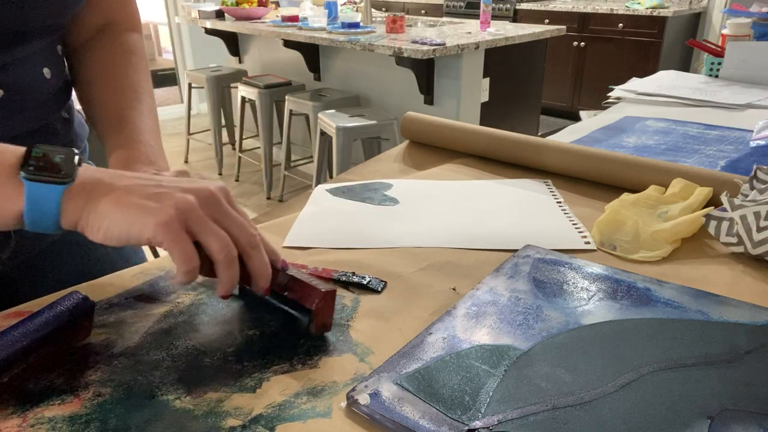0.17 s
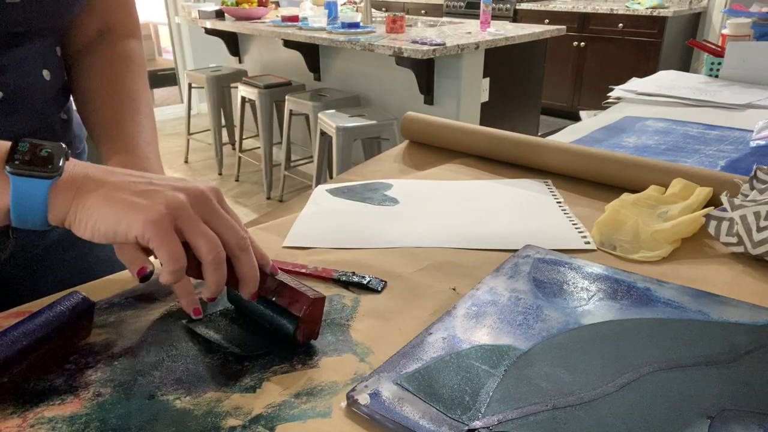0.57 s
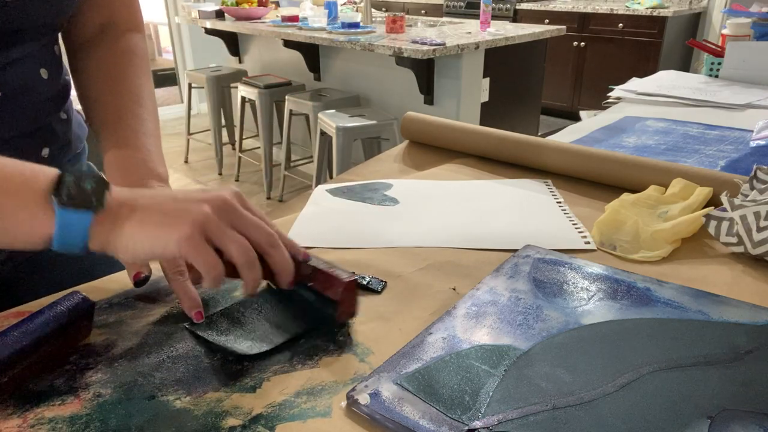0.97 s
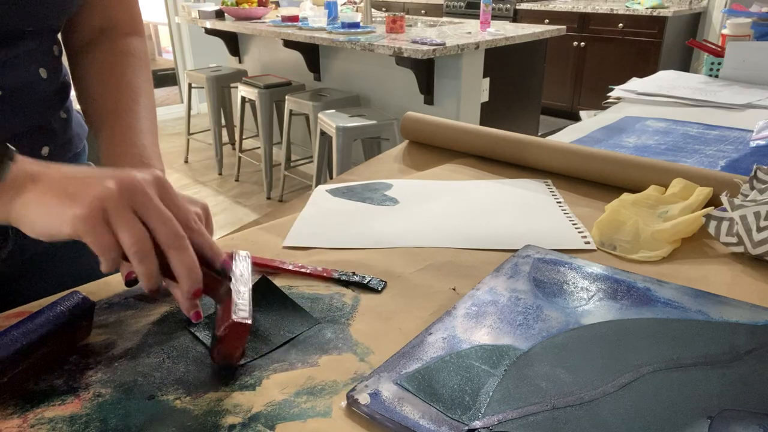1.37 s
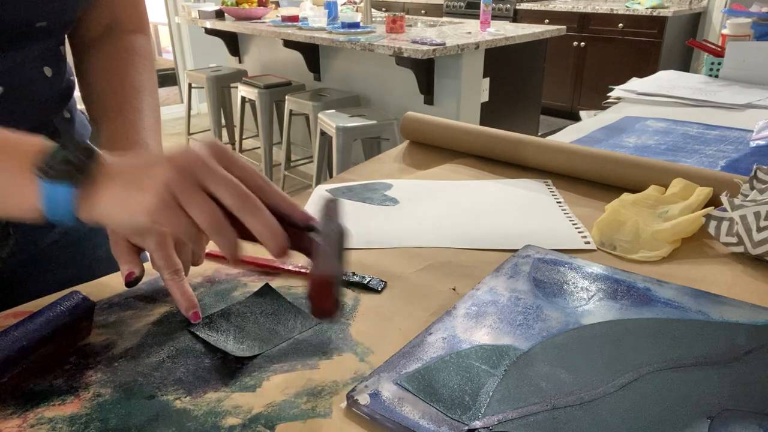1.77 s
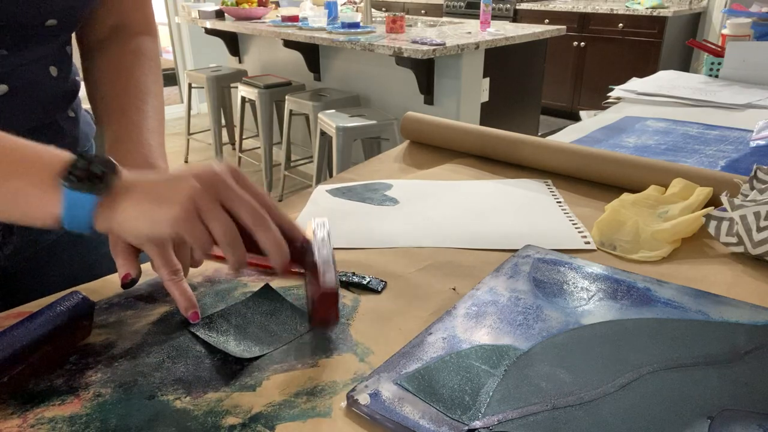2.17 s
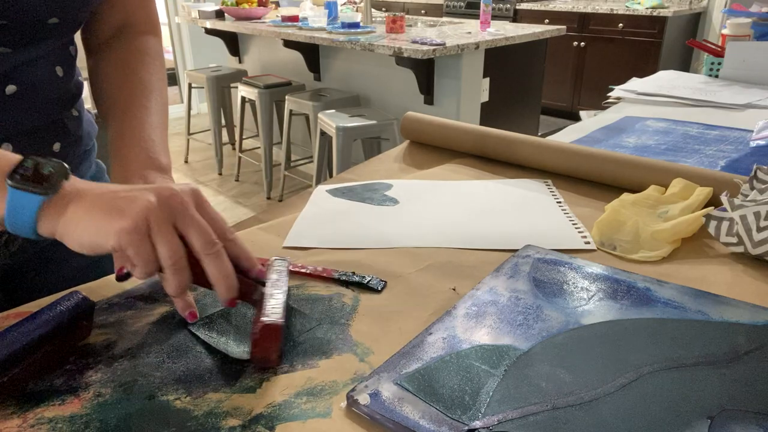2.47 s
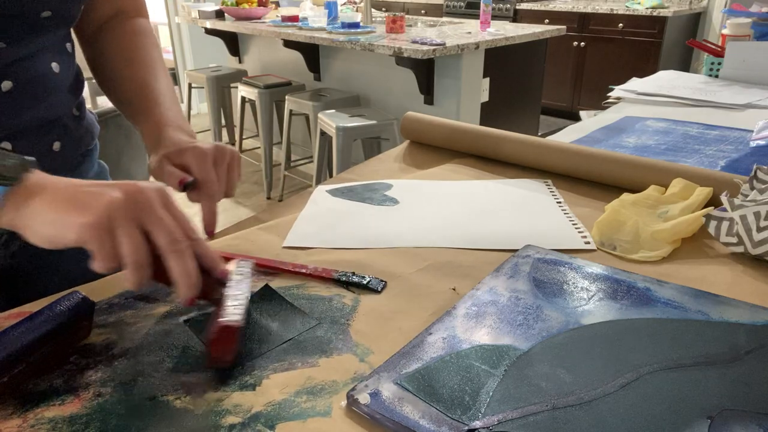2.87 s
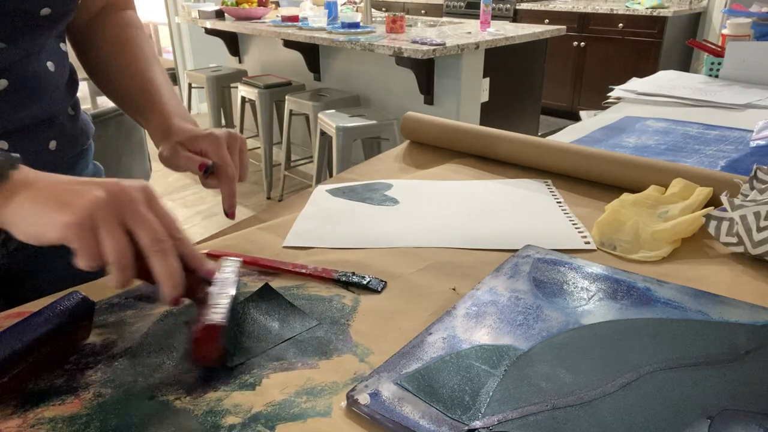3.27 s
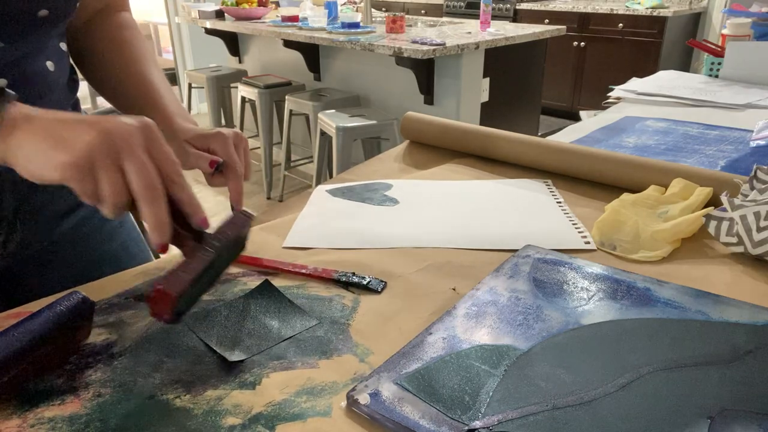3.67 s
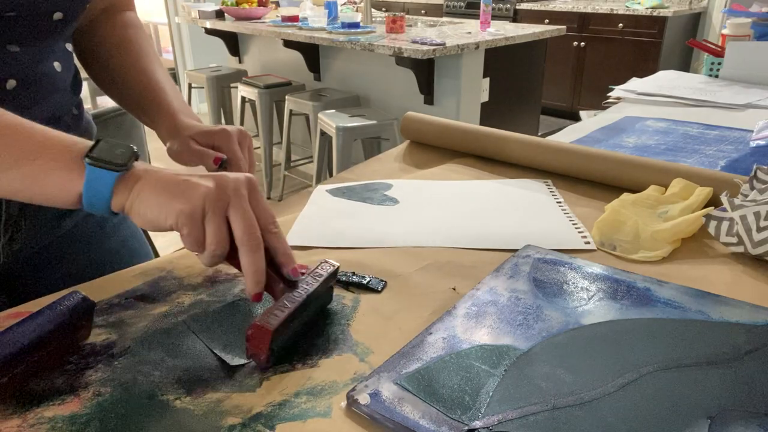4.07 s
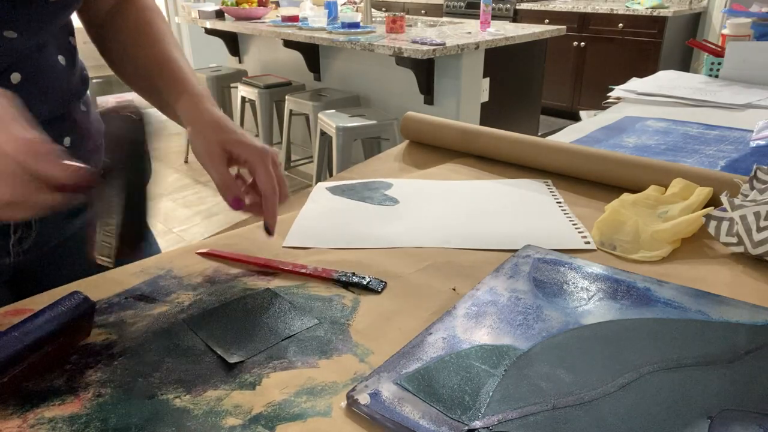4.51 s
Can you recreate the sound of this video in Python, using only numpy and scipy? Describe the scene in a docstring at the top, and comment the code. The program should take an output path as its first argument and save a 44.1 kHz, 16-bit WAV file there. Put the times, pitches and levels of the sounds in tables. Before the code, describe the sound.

Sticky hissing strokes of an ink roller on paper, with loose frame clicks and hard table knocks in a softly humming kitchen.

```python
"""A rubber hand roller goes back and forth over inked paper on a kitchen table, close to a phone.
Ink threads snap behind it: grainy noise through resonances makes a dense crackling hiss.
The loose axle clicks in its frame and the table thuds, both as short rings of blurred modes;
rolling also rumbles the table. Paper rustles and a light rub passes as shaped noise.
Walls add a noise echo, over room tone in flickering bands and a wavering refrigerator hum."""
import sys
import numpy as np
from scipy import signal
from scipy.fft import rfft, irfft, next_fast_len
from scipy.io import wavfile
from scipy.ndimage import uniform_filter1d

SR = 44100
rng = np.random.default_rng(int(sys.argv[2]) if len(sys.argv) > 2 else 0)


def generate_wav(sig):
    """Save sig (samples, or channels by samples) to the path in sys.argv[1] as 16-bit PCM at SR."""
    pcm = np.round(np.clip(np.atleast_2d(sig).T, -1, 1) * 32767).astype(np.int16)
    wavfile.write(sys.argv[1], SR, pcm)


N = 204705

# Room tone spectrum, relative: pitch_hz, density_db (per Hz)
ROOM_TONE = [(30, -40), (55, 4), (90, -18.5), (124, 18.5), (145, -17), (239, -16), (266, -7), (345, -28.5),
             (499, -47.5), (600, -14), (962, -91.5), (16000, -83)]
ROOM_TONE_DB = -50  # rms level of the whole room tone
HUM_HZ, HUM_DB = 116.5, -49.5  # centre pitch and level of the wavering hum

# Paper and fingers rustling, joined by straight lines: time_s, level_db (gain on the rustle noise)
RUSTLE_LEVELS = [(0.0, -59.5), (0.2, -65), (0.36, -78), (0.61, -87.5), (0.95, -64.5), (1.12, -63),
                 (1.31, -65), (1.36, -77.5), (1.44, -63.5), (1.76, -56), (1.96, -63), (2.1, -51.5),
                 (2.38, -62.5), (2.5, -57.5), (2.8, -66.5), (3.5, -57), (3.8, -76), (4.06, -60),
                 (4.64, -60)]

# Axle clicks: start_s, peak_db (of the mid), tilt_db (brightness, per octave),
# ring_length (ratio to a free ring)
AXLE_CLICKS = [(0.0455, -38, -15.5, .8), (0.069, -21, -10.5, 0.4), (0.0777, -35, -11, .6),
               (0.171, -37.5, 17, 1), (0.642, -56, 7.5, 1.5), (1.084, -41, -3, 1.5), (1.1, -34, -11, 0.91),
               (1.109, -43, -13, 1.7), (1.117, -46, -12, 1.3), (1.4541, -15.5, 2, 1),
               (1.7488, -35, 2, 1.66), (1.831, -33.5, -18, 0.92), (1.981, -39, -7, 0.92),
               (1.99, -25.5, 2, 1.4), (1.9934, -14.5, -1, 0.81), (1.9976, -5.5, -2, 0.53),
               (2.2108, -36, -15, 0.87), (2.2974, -34, -12, 1.4), (2.3417, -42, -6, 1.1),
               (2.423, -20, 1, 0.36), (2.425, -24, 1.5, 1.3), (2.595, -36.5, -30, 1.9),
               (2.884, -23.5, 2.5, 1.07), (3.196, -31.5, -11.5, 1.6), (3.4254, -34.5, -11, 0.95),
               (3.483, -33.5, -5, 0.55), (3.492, -38, -12, 1), (3.499, -36, -12, 1.58),
               (3.8494, -20.5, 1, 0.89), (3.8533, -5.5, -2.5, .85), (3.8625, -27, -2, 1.1),
               (3.867, -25, -2, 1.2), (4.411, -31.5, -28, 1.54)]
# Roller frame modes: pitch_hz, width_hz, level_db (before each click's tilt), t60_s (of a free ring)
FRAME_MODES = [(1656, 550, -6, 0.007), (2169, 160, -13, 0.018), (2482, 190, -0.5, 0.011),
               (3003, 74, -21.5, 0.077), (3088, 1130, 9.5, 0.0081), (3980, 690, -6, 0.0094),
               (7040, 3600, -7.5, 0.0072)]

# Roller or fingers on the table: start_s, peak_db (body), bass_peak_db, tilt_db (hardness, per octave),
# middle_db (modes near MIDDLE_HZ, which depend on where the blow lands)
TABLE_THUDS = [(0.068, -37.5, -41, 5, -3.5), (0.196, -42.5, -46, 2, -9), (0.615, -47, -53, -1, -5),
               (0.773, -41.5, -65, -12.5, 4), (1.082, -36.5, -56, 6.5, -7), (1.097, -33, -31.5, 13.5, -3),
               (1.4522, -21, -21.5, 0, 3), (1.747, -37, -34, 6, -7.5), (1.994, -14, -21, 0.5, -10.5),
               (2.422, -11, -18, -3, -10.5), (2.887, -41.5, -46, 9.5, 5), (3.009, -51, -37, 7, 0),
               (3.196, -40.5, -48, 6, -3), (3.41, -38, -39.5, 3.5, 0.5), (3.484, -31, -36.5, 9, 0),
               (3.8516, -9.5, -19, 1, -3.5), (4.408, -30.5, -35, 4, -7)]
# Table top modes, damped and dense: pitch_hz, width_hz, level_db (before tilts), t60_s
# The first three rows are the bass.
TABLE_MODES = [(60, 17, -22.5, 0.04), (99.5, 40.5, -0.5, 0.14), (143, 79, -8, 0.12), (202, 57, 4, 0.056),
               (272.3, 43, 5, 0.068), (380.8, 45, 1, 0.066), (487, 31, -4, 0.15), (589.5, 64, 1, 0.027),
               (699.5, 78, -4, 0.059), (916, 134, -9.5, 0.05), (1243, 230, -10, 0.043),
               (1654, 880, -18.5, 0.073), (558, 520, 6.5, .016)]
MIDDLE_HZ, MIDDLE_OCTAVES = 460, 0.18
RUMBLE_TILT_DB = -0.5  # per octave, across the modes that rolling shakes

# Roller strokes: fastest_s, rise_s (speeding up), fall_s (slowing down), start_softness (power),
# hiss_db (ink), dull_db (duller part of the hiss, relative), rumble_db (table)
ROLLER_STROKES = [(.175, 0.03, 0.18, .9, -66, -3.5, -75), (0.914, .12, 0.25, 1.04, -43.5, -12, -74),
                  (1.594, 0.13, 0.16, 0.54, -40.5, -11.5, -51.5), (2.099, 0.12, 0.11, 1.7, -37, -11, -41.5),
                  (2.434, 0.022, 0.025, 0.37, -56, 0, -48), (2.672, 0.16, 0.21, 0.74, -38, -13, -57),
                  (2.909, 0.08, 0.098, 1.8, -38.5, -11.5, -52.5), (3.059, 0.051, 0.11, 0.54, -38, -10, -56),
                  (3.225, 0.049, 0.096, 0.45, -43, -10.5, -68), (3.35, 0.033, 0.15, 0.5, -39.5, -10, -56),
                  (3.981, 0.15, 0.24, 1.06, -44, -6, -46.5), (4.279, 0.13, 0.14, 0.56, -34, -13.5, -53)]
FALL_POWER = 3.8  # hiss gain follows the falling roller speed to this power; the rumble follows less

# Brighter ink hiss resonances: pitch_hz, width_hz, level_db
BRIGHT_INK = [(10800, 2920, 8.5), (12670, 3040, 10), (14080, 1880, 7.5), (8600, 1800, 6.5)]
# Duller ink hiss resonances: pitch_hz, width_hz, level_db (before flicker and dull_db)
DULL_INK = [(6690, 440, 17.5), (5500, 300, 13.5), (4310, 130, 15.5), (2977, 1370, 13.5), (2412, 240, 6)]
# Larger snaps where paper or roller meets or leaves the ink: start_s, peak_db (drive into the hiss)
INK_PEELS = [(0.142, -50.5), (0.171, -54), (0.8087, -41.5), (0.8226, -40), (0.837, -40), (0.856, -32.5),
             (0.8826, -41), (0.951, -36.5), (0.965, -36), (0.988, -37), (1.092, -43.5), (1.998, -37),
             (4.384, -45)]
LINGER_DB, LINGER_T60_S = -10, 0.38  # the wet ink keeps crackling faintly after a stroke
SNAP_SPREAD_DB, PATCHY_DB = 1.57, 0.74  # spread of snap sizes; flicker of each duller band

# A faint narrow rub leads into the first long stroke.
SCUFF_START_S, SCUFF_END_S = 0.612, 0.77
SCUFF_HZ, SCUFF_WIDTH_HZ, SCUFF_DB = 1840, 390, -75

ROOM_T60_S, ROOM_TREBLE_T60_S, ROOM_DB = 0.56, 0.18, -9.5
PORT_LAG_S, SHARED_HZ = .000169, 6600  # delay of the right treble; crossover to shared treble
TOP_HZ = 16100


def undb(db):
    """Decibels to gain."""
    return 10 ** (np.asarray(db) / 20)


def unit(x):
    """Scale to rms 1."""
    return x / np.sqrt(np.mean(x ** 2))


def band(x, hz, width_hz):
    """Resonance run twice for steep sides, gain 1 at the centre."""
    b, a = signal.iirpeak(hz, hz / width_hz, SR)
    once = signal.lfilter(b, a, x)
    return signal.lfilter(b, a, once)


def walk(rate):
    """Random levels held for 1 / rate seconds and smoothed twice; spread near 1."""
    hold = int(SR / rate)
    steps = np.repeat(rng.standard_normal(N // hold + 1), hold)
    smooth = uniform_filter1d(uniform_filter1d(steps, hold), hold)
    return 1.3 * smooth[:N]


def stereo(mid, side, share):
    """Mid in both channels, with a share of the side added left and subtracted right."""
    return mid + share * side * np.array([[1], [-1]])


def add(track, start_s, x):
    """Mix a short sound in at its start time."""
    i = int(start_s * SR)
    x = x[..., :N - i]
    track[..., i:i + x.shape[-1]] += x


def kitchen():
    """Room tone in flickering half-octave bands, more alike left and right in the bass, plus the hum."""
    tone = 0
    table_hz, table_db = np.transpose(ROOM_TONE)
    for hz in 35 * 2 ** np.arange(0, 8.9, .5):
        mid = unit(band(rng.standard_normal(N), hz, hz / 2))
        side = unit(band(rng.standard_normal(N), hz, hz / 2))
        density_db = np.interp(np.log(hz), np.log(table_hz), table_db)
        band_db = density_db + 10 * np.log10(hz) + 2.6 * walk(12.0)
        tone = tone + undb(band_db) * stereo(mid, side, np.clip(hz / 640.0, .25, .85))
    hum_hz = HUM_HZ * (1 + 0.0031 * walk(1.92))
    hum = np.sin(2 * np.pi * np.cumsum(hum_hz) / SR) * undb(HUM_DB + 1.8 * walk(5.8))
    return unit(tone) * undb(ROOM_TONE_DB) + hum


def rustle():
    """Paper friction as soft broad noise, falling towards the treble and slightly grainy."""
    grain = undb(2 * walk(50)) * rng.standard_normal((2, N))
    soft = unit(band(grain, 1200, 4000))
    crisp = undb(-16.5) * unit(band(grain, 3590, 2000))
    airy = undb(-9.0) * unit(band(grain, 6100, 4600))
    mid, side = soft + crisp + airy
    time_s, level_db = np.transpose(RUSTLE_LEVELS)
    level = undb(np.interp(np.arange(N) / SR, time_s, level_db))
    return level * stereo(mid, side, 1.0)


def ring(modes, gains, length_s, rise_cycles, blur):
    """One blow on a damped body: each mode is a sine blurred by its crowd of close neighbours; mid peak 1."""
    t = np.arange(int(length_s * SR)) / SR
    out = 0
    for k, ((hz, width_hz, level_db, t60_s), gain) in enumerate(zip(modes, gains)):
        noise = rng.standard_normal((2, 2 * len(t)))
        crowd = blur * unit(band(noise, hz, width_hz)[:, len(t):])  # skips the filter's build-up
        detuned_hz = hz + 0.19 * width_hz * rng.standard_normal()
        crowd[0] += np.sin(2 * np.pi * detuned_hz * t)  # starts in step with the blow
        swell = (1 - np.exp(-t * hz / rise_cycles)) ** 2 * 1000. ** (-t / t60_s)
        # every blow feeds a mode its full energy
        energy = np.sum((crowd * swell) ** 2, axis=1, keepdims=True)
        share = np.sqrt(np.sum(swell ** 2) / energy)
        direction = (-1) ** k  # successive table rows start in opposite directions
        out = out + direction * gain * undb(level_db) * share * crowd * swell
    return out / np.abs(out[0]).max()


def axle():
    """The axle knocks its bearing: short frame rings; a gripping hand cuts them and mutes the narrow modes."""
    out = np.zeros((2, N))
    for start_s, peak_db, tilt_db, ring_length in AXLE_CLICKS:
        gains, held = [], []
        for hz, width_hz, level_db, t60_s in FRAME_MODES:
            grip = ring_length ** 2 if width_hz < 250 else 1  # a longer ring strengthens them instead
            gains.append(undb(tilt_db * np.log2(hz / 3000)) * grip)
            held.append((hz, width_hz, level_db, t60_s * ring_length))
        mid, side = ring(held, gains, 0.063, rise_cycles=4.36, blur=0.79)
        add(out, start_s, undb(peak_db) * stereo(mid, side, 0.46))
    return out


def strokes(peaks_db, sharpness=1):
    """Gain driven by the roller: each stroke follows a sine arch of speed; low sharpness follows it less."""
    out = np.zeros(N)
    for (fastest_s, rise_s, fall_s, softness, *_), peak_db in zip(ROLLER_STROKES, peaks_db):
        rise = np.sin(np.linspace(0, np.pi / 2, int(rise_s * SR)))
        fall = np.sin(np.linspace(0, np.pi / 2, int(fall_s * SR)))[::-1]
        arch = np.concatenate([rise ** softness, fall ** FALL_POWER])
        add(out, fastest_s - rise_s, undb(peak_db) * arch ** sharpness)
    return out


def table():
    """Soft rubber blows and rolling both shake the table top; its bass is nearly alike left and right."""
    out = np.zeros((2, N))
    bass, body = TABLE_MODES[:3], TABLE_MODES[3:]
    for start_s, peak_db, bass_peak_db, tilt_db, middle_db in TABLE_THUDS:
        gains = []
        for hz, *_ in body:
            middle = np.exp(-(np.log2(hz / MIDDLE_HZ) / MIDDLE_OCTAVES) ** 2)
            gains.append(undb(tilt_db * np.log2(hz / 300) + middle_db * middle))
        body_ring = ring(body, gains, .3, rise_cycles=1.04, blur=0.85)
        bass_ring = ring(bass, np.ones(len(bass)), .3, rise_cycles=0.66, blur=0.58)
        add(out, start_s, undb(peak_db) * body_ring)
        add(out, start_s, undb(bass_peak_db) * bass_ring)
    bumps = undb(2 * walk(30.2)) * rng.standard_normal((2, N))
    rumble = 0
    for hz, width_hz, level_db, _ in body[:8]:
        mode_db = level_db + RUMBLE_TILT_DB * np.log2(hz)
        rumble = rumble + undb(mode_db) * band(bumps, hz, 1.35 * width_hz)
    rumble_db = np.transpose(ROLLER_STROKES)[-1]
    out += strokes(rumble_db, sharpness=.4) * unit(rumble)
    # the side is limited to the middle range, and the right channel is a little louder
    return stereo(out[0], band(out[1], 703, 900), 1.2) * undb([[-1.1], [1.1]])


def ink():
    """Over a thousand ink threads snap a second, a few far larger; peeling adds larger snaps."""
    fastest_s, rise_s, _, _, hiss_db, dull_db, _ = np.transpose(ROLLER_STROKES)
    begin_s = fastest_s - rise_s
    current = np.searchsorted(begin_s[1:], np.arange(N) / SR)  # the stroke begun last
    hiss = strokes(hiss_db)
    keep = 1000. ** (-1 / (LINGER_T60_S * SR))
    hiss = hiss + undb(LINGER_DB) * signal.lfilter([1 - keep], [1, -keep], hiss)
    hold = int(0.00081 * SR)  # a snap lasts under a millisecond
    sizes = np.repeat(rng.exponential(size=N // hold + 1), hold)[:N] - 1
    effort = undb(SNAP_SPREAD_DB * sizes + 4.8 * walk(30))
    # evened out over 50 ms, so the strokes set the overall loudness
    strength = hiss * effort / np.sqrt(uniform_filter1d(effort ** 2, SR // 20))
    snap = np.exp(-np.arange(SR // 100) / (0.003 * SR))
    for start_s, peak_db in INK_PEELS:
        add(strength, start_s, undb(peak_db) * snap)
    crackle = strength * rng.standard_normal((2, N))
    bright, dull = 0, 0
    for hz, width_hz, level_db in BRIGHT_INK:
        bright = bright + undb(level_db) * band(crackle[0], hz, width_hz)
    for hz, width_hz, level_db in DULL_INK:
        flicker_db = PATCHY_DB * walk(90.)
        dull = dull + undb(level_db + flicker_db) * band(crackle, hz, width_hz)
    return bright + undb(dull_db[current]) * stereo(dull[0], dull[1], 0.68)


def scuff():
    """Something drags lightly over the paper: a narrow, uneven band of friction noise."""
    t = np.arange(N) / SR
    on = uniform_filter1d(1. * ((t > SCUFF_START_S) & (t < SCUFF_END_S)), SR // 100)
    friction = unit(band(rng.standard_normal((2, N)), SCUFF_HZ, SCUFF_WIDTH_HZ))
    return undb(SCUFF_DB + 2.0 * walk(24.3)) * on * friction


def walls(x):
    """Dense echo that builds over the first milliseconds and loses treble first, unlike left and right."""
    t = np.arange(SR) / SR
    noise = rng.standard_normal((2, SR))
    low = signal.lfilter(*signal.butter(2, 1500, fs=SR), noise)
    low_tail = low * 1000. ** (-t / ROOM_T60_S)
    treble_tail = (noise - low) * 1000. ** (-t / ROOM_TREBLE_T60_S)
    tail = (low_tail + treble_tail) * (1 - np.exp(-t / 0.0058))
    tail = tail / np.sqrt(np.sum(tail[0] ** 2))
    return signal.fftconvolve(x[None], tail, axes=1)[:, :N]


def scene():
    """Roller, axle, table and paper with their echo from the kitchen walls, over the room tone."""
    near = rustle() + axle() + table() + ink() + scuff()
    # the table radiates its bass poorly, so little of it reaches the walls
    airborne = signal.lfilter(*signal.butter(2, 220, "high", fs=SR), near.mean(axis=0))
    return near + undb(ROOM_DB) * walls(airborne) + kitchen()


def record(dry):
    """Both channels carry the same treble, the right one a port spacing later; bass and top are cut."""
    size = next_fast_len(N + SR // 10)
    hz = np.arange(size // 2 + 1) * SR / size
    left, right = rfft(dry, size)
    shared = 1 / (1 + (SHARED_HZ / (hz + 1)) ** 12)
    treble = shared * (left + right) / 2
    late = np.exp(-2j * np.pi * hz * PORT_LAG_S)
    left_out = (1 - shared) * left + treble
    right_out = (1 - shared) * right + treble * late
    wet = irfft(np.array([left_out, right_out]), size)[:, :N]
    wet = signal.sosfilt(signal.butter(4, 50, "high", fs=SR, output="sos"), wet)
    return signal.sosfilt(signal.ellip(10, .2, 75, TOP_HZ, fs=SR, output="sos"), wet)


dry = scene()
out = record(dry)
generate_wav(out)
```